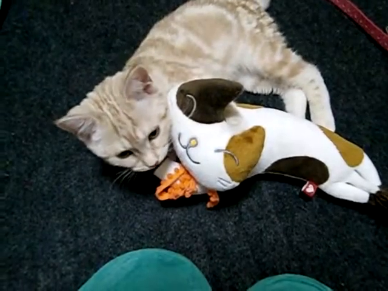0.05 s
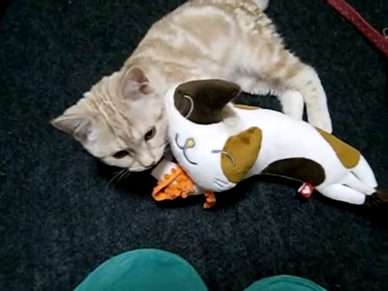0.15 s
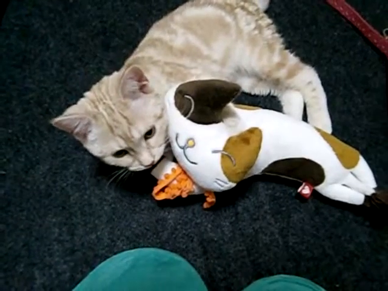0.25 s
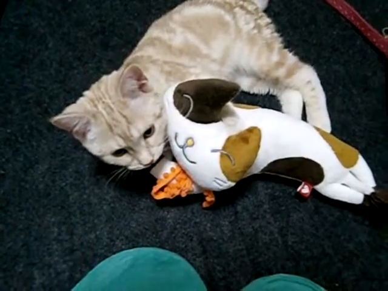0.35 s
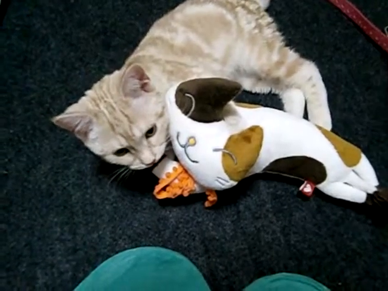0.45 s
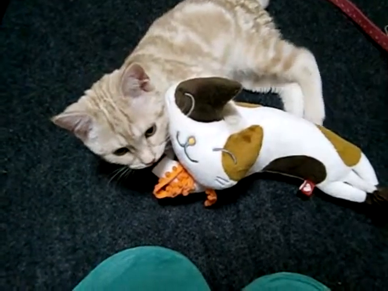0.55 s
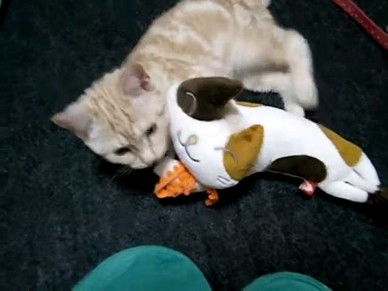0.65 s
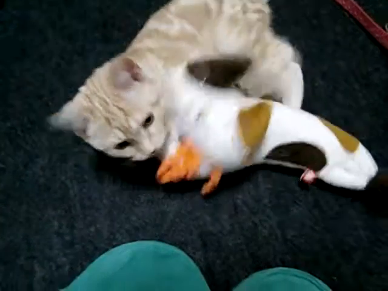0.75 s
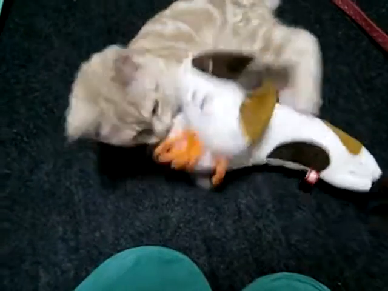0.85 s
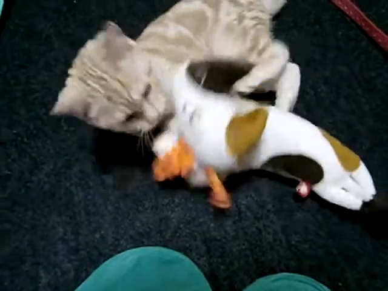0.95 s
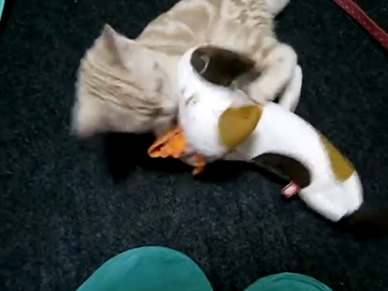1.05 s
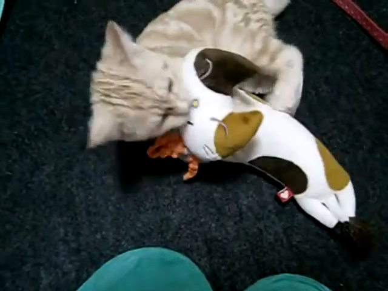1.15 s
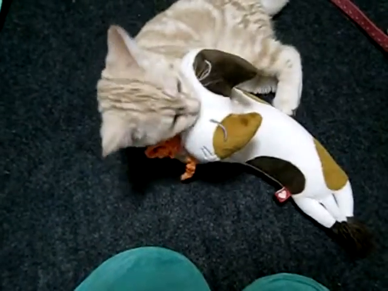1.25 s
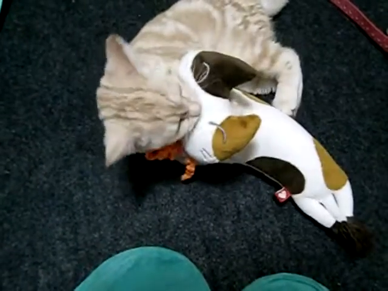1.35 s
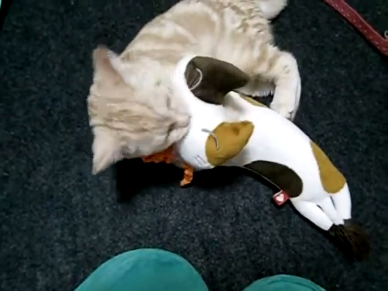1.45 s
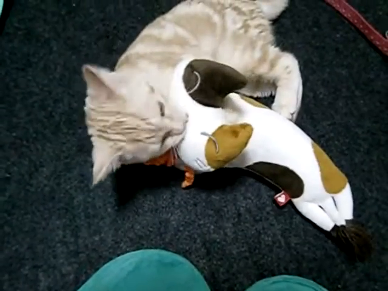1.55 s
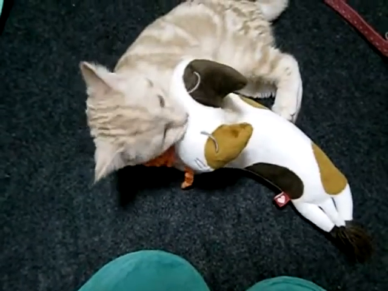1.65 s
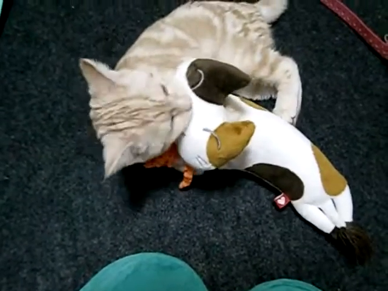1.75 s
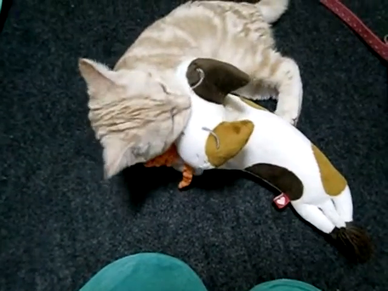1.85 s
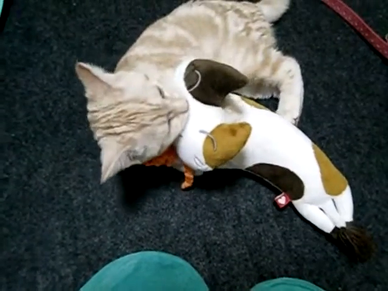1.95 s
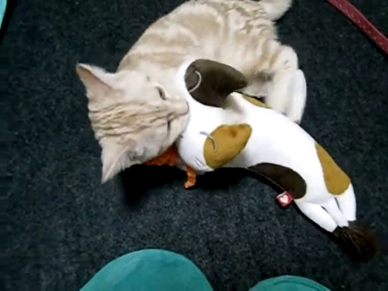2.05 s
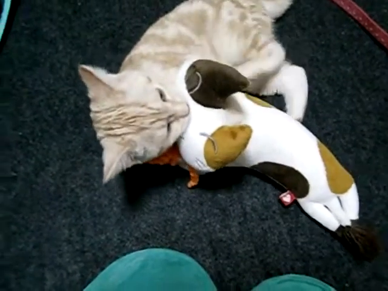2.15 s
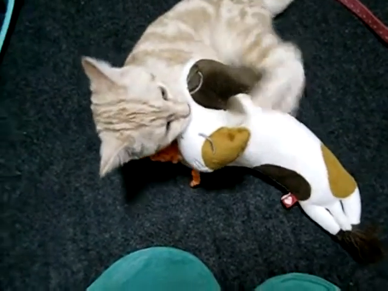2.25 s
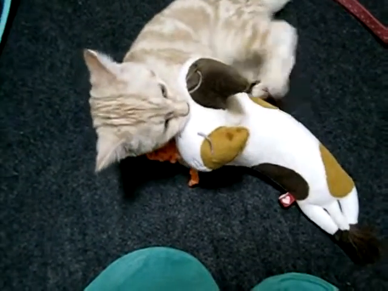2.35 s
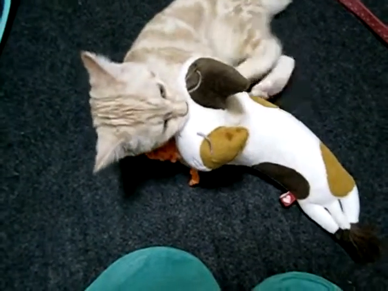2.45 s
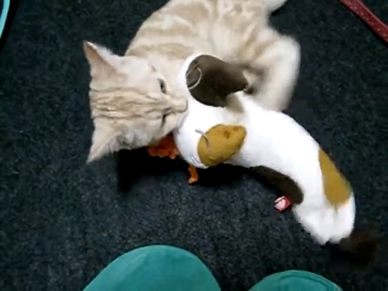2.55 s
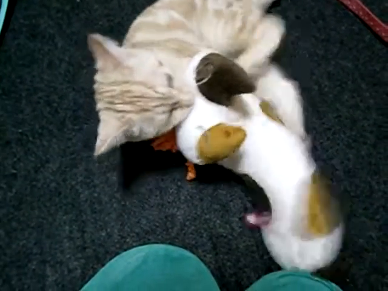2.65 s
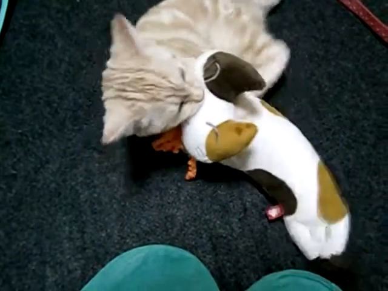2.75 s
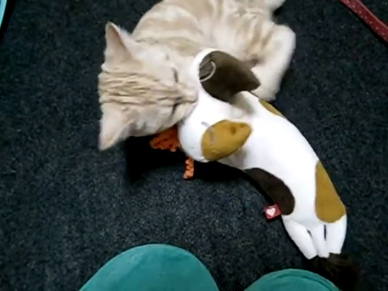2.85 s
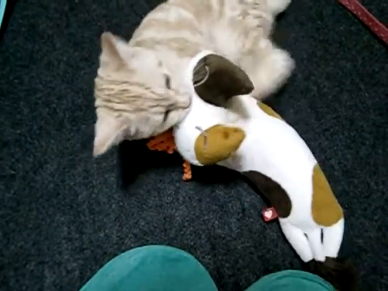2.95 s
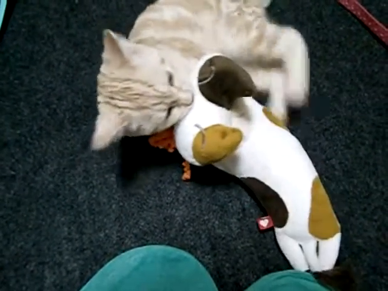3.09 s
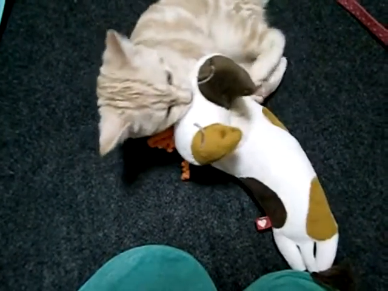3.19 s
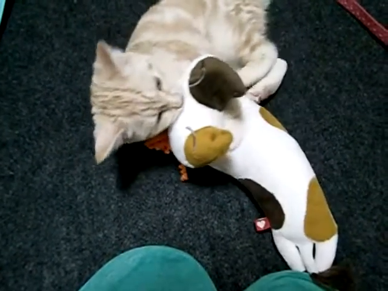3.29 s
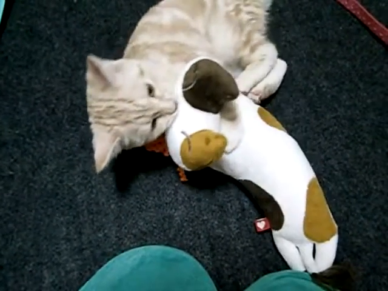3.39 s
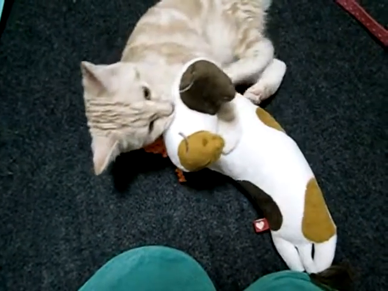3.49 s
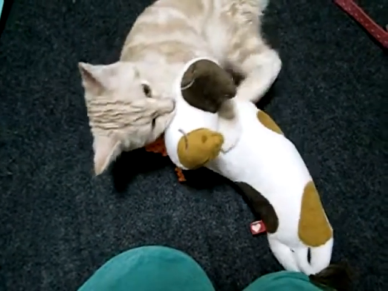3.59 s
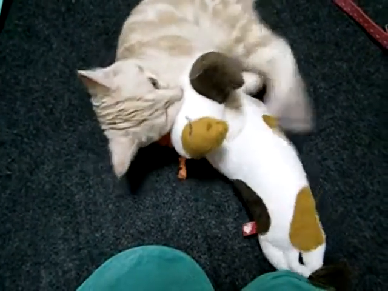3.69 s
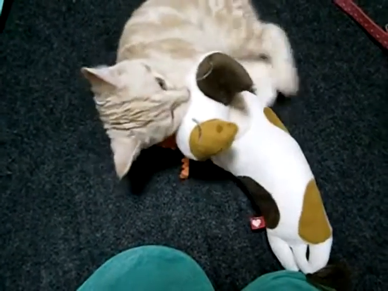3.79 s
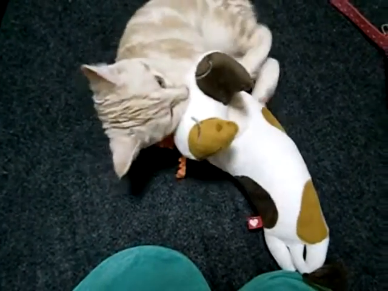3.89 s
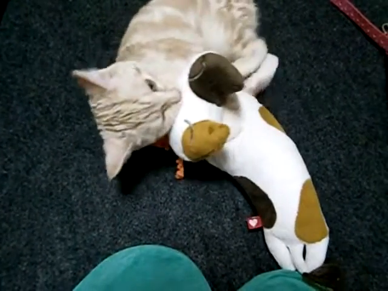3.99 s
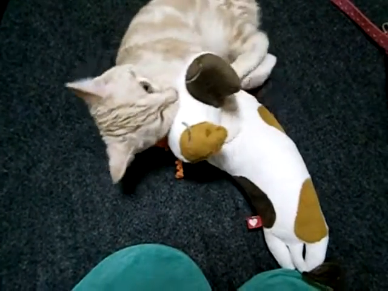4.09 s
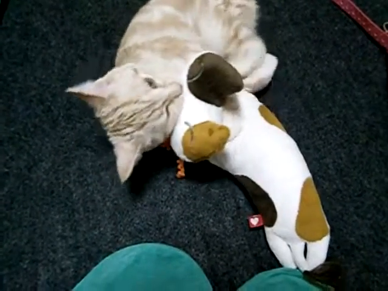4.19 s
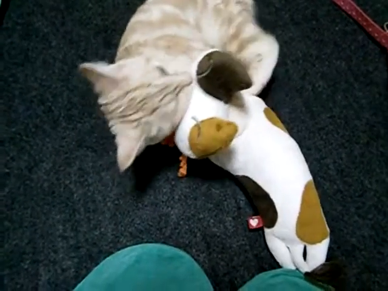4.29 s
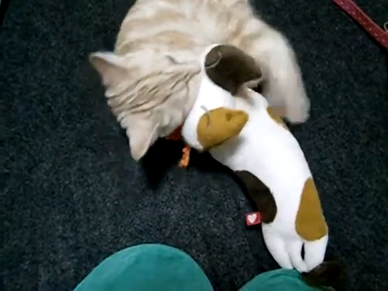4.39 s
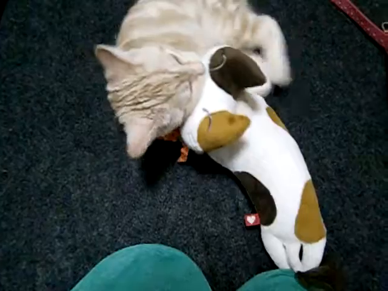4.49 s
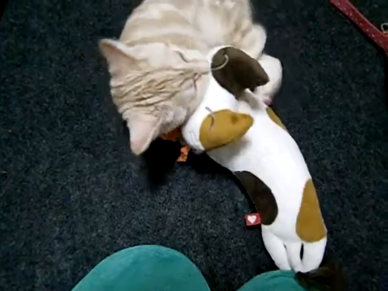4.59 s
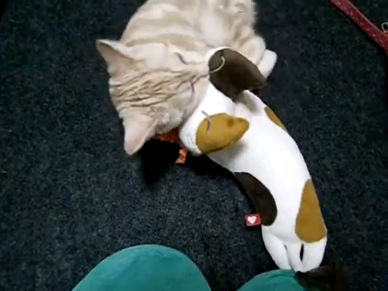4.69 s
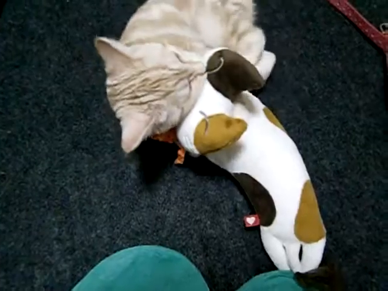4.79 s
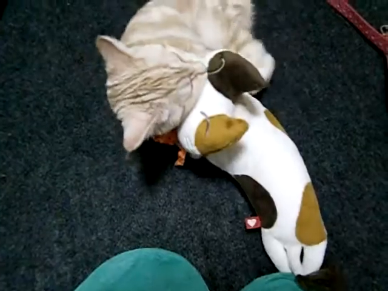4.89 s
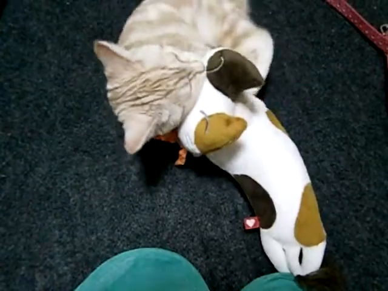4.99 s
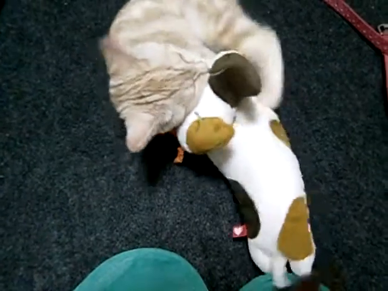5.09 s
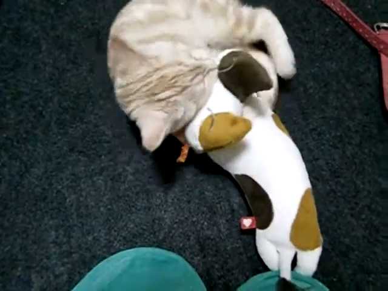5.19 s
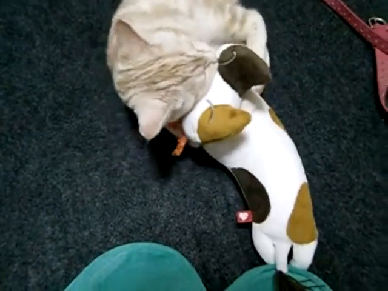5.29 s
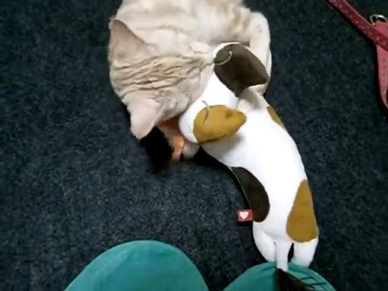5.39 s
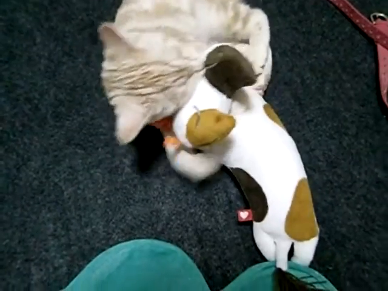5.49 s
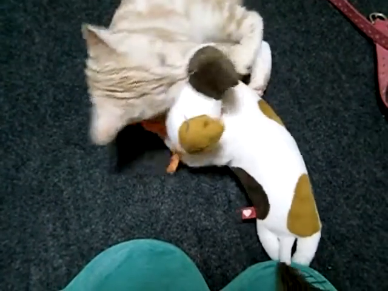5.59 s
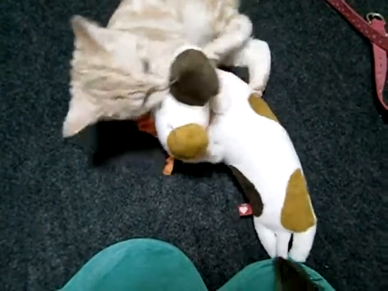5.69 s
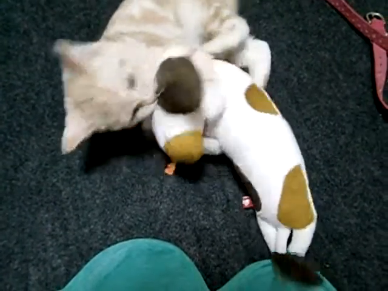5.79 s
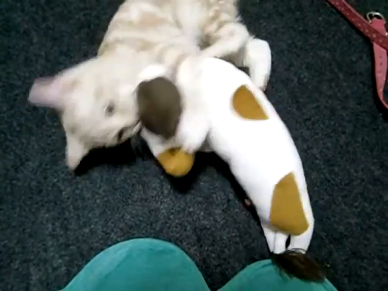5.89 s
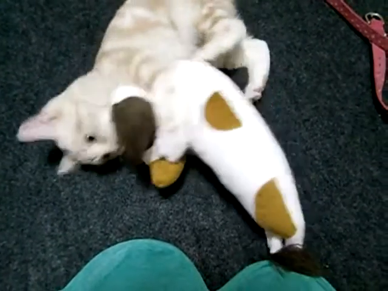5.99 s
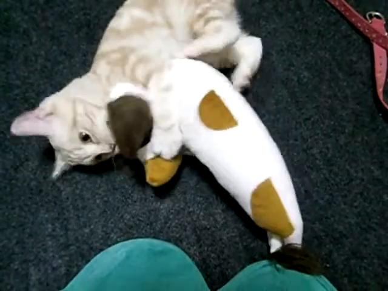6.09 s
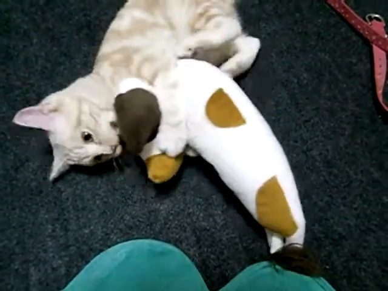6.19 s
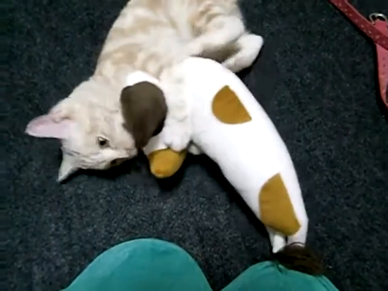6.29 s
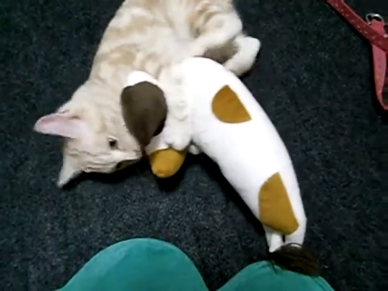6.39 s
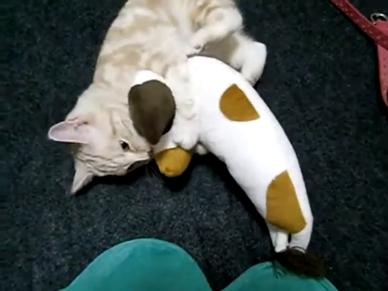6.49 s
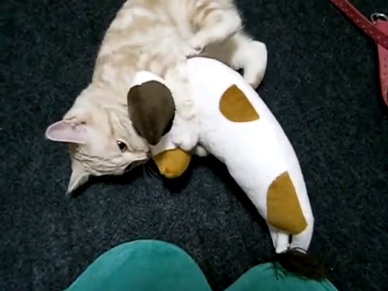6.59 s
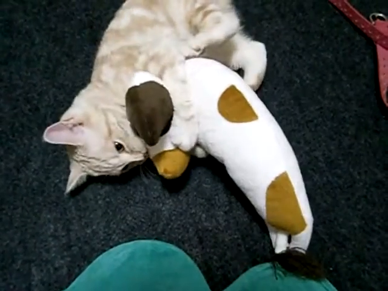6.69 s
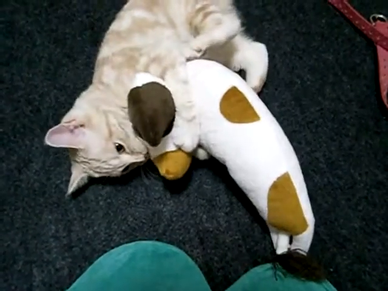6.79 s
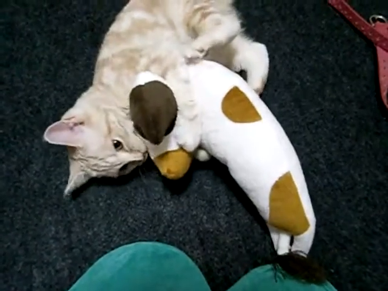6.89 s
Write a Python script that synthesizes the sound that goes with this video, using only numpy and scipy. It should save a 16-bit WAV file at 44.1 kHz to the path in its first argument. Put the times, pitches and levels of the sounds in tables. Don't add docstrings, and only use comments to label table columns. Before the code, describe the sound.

Quiet room hush, then a kitten's kicked plush toy rattles its tiny bright bell in uneven bursts, fading to a gentle roll.

```python
import sys
import numpy as np
from scipy import signal
from scipy.io import wavfile
from scipy.ndimage import uniform_filter1d

SR = 44100
rng = np.random.default_rng(int(sys.argv[2]) if len(sys.argv) > 2 else 0)


def voltage_ratio(decibels):
    exponent = np.asarray(decibels, float) / 20
    return 10 ** exponent


def int16_out(signal):
    q = np.round(np.clip(np.atleast_2d(signal).T, -1, 1) * 32767)
    wavfile.write(sys.argv[1], SR, q.astype(np.int16))


N = 306318


def evened(x):
    return x / np.sqrt(np.mean(x ** 2))


def add(mix, s, sound):
    part = mix[round(s * SR):][:len(sound)]
    part += sound[:len(part)]


def resonate(x, hz, width):
    pole = np.exp((2j * np.pi * hz - np.pi * width) / SR)
    return 2 * signal.lfilter([1 - abs(pole)], [1, -pole], x).real


def ring_filter(x, hz, t60, softness_hz):
    soft = resonate(x, hz, softness_hz)
    return resonate(soft, hz, np.log(1000) / np.pi / t60) * t60 * SR / (2 * np.log(1000))


def decaying(hits, t60_e):
    return signal.lfilter([1], [1, -np.exp(-1 / (t60_e * SR))], hits)


# [f/Hz, level/dB per Hz]
HUSH_COLOUR = [(12, -55), (20, -1.5), (91, -5), (164, -3.5), (257, -9), (437, -9.5), (532, -11.5),
               (811, -14.5), (5020, -25.5), (15000, -27.5), (16300, -26.5)]
# [f/Hz, width/Hz, level/dB rms]
HUM = [
    (119.8, 29, -68),
    (163.1, 13.4, -66.5),
]


def hush(level_db=-56.5, patchy_db=0.66):
    frames, hz = N // 256 + 5, np.fft.rfftfreq(1024, 1 / SR)
    a, b, patches = rng.standard_normal((frames, 513, 3)).T
    patches = evened(uniform_filter1d(uniform_filter1d(patches, 12, 0), 14, 1))
    f, db = np.transpose(HUSH_COLOUR)
    colour_db = np.interp(np.log(hz + 1), np.log(f + 1), db)[:, None]
    spectra = (a + 1j * b) * voltage_ratio(colour_db + patchy_db * patches)
    air = signal.istft(spectra, nperseg=1024, noverlap=768)[1][:N]
    noise = rng.standard_normal(N)
    hum = sum(voltage_ratio(g) * evened(resonate(resonate(noise, f, w), f, w)) for f, w, g in HUM)
    return voltage_ratio(level_db) * evened(air) + hum


# [f/Hz, width/Hz, level/dB]
TICK_BODY = [
    (1120, 1200, 3.5),
    (2150, 580, -3.5),
    (3840, 1500, 7.5),
]
# [t/s, peak level/dB]
MOUNT_TICKS = [(.7958, -26.5), (.8013, -29), (.8196, -26), (.8401, -29.5), (.9007, -34), (.928, -33.5),
               (1.0239, -32), (1.0526, -33.5), (1.1601, -36), (1.191, -38), (1.2212, -34), (1.3314, -40),
               (2.6263, -34), (2.6414, -28), (2.6508, -27), (2.6715, -34), (2.6861, -25.5), (2.6917, -25.5),
               (2.6977, -32), (2.737, -31), (2.7416, -24.5), (2.788, -29.5),
               (3.0139, -25), (3.0532, -32), (3.0614, -24.5), (3.068, -25), (3.1015, -26), (3.1051, -21),
              (3.1294, -26), (3.2072, -35.5), (3.7496, -27.5), (3.7704, -27.5), (3.8298, -25.5),
              (3.9208, -33.5), (4.4641, -32.5), (4.4965, -31.5), (4.5874, -33), (5.0608, -28.5),
              (5.077, -35.5), (5.1002, -38), (5.1189, -27), (5.212, -32.5), (5.2648, -30.5), (6.1075, -38)]
# [t/s, peak level/dB]
FAINT_TICKS = [(0.8254, -33), (0.8754, -35), (1.0384, -39), (1.1157, -33.5), (2.945, -38.5), (2.9926, -35),
               (3.2001, -46), (3.2283, -35), (3.8204, -35), (3.8701, -40), (3.9498, -36), (4.3784, -41),
               (4.5296, -39), (5.1089, -31.5), (5.1741, -39), (5.1887, -35.5), (5.3086, -33.5)]


def ticks(rows, contacts, burst_s=0.00024, chatter_db=-16, chatter_s=0.0079, per_s=1100):
    out, t = np.zeros(N), np.arange(500) / SR
    jolt_db = -26.5 + 0.48 * contacts[:, 1] + 2 * rng.standard_normal(len(contacts))
    rows = rows + list(zip(contacts[:, 0], jolt_db))
    bursts = rng.standard_normal((len(rows), 500))
    for (s, db), burst in zip(rows, bursts):
        blow = (1 + .5 * burst) * np.exp(-t / burst_s) * np.sin(2 * np.pi * t / burst_s / 2)
        colour = 2 * np.tanh(burst[::-1])
        tick = np.zeros(500)
        for (f, w, g), c in zip(TICK_BODY, colour):
            tick += voltage_ratio(g + c) * resonate(blow, f * (1 + c / 20), w)
        tick *= voltage_ratio(db - 1.5) / abs(tick).max()
        add(out, s, tick)

    knocks = np.zeros(N)
    knocks[[round(s * SR) for s, db in rows]] = voltage_ratio(np.transpose(rows)[1] + chatter_db)
    loose = decaying(knocks, chatter_s)
    taps = loose * rng.uniform(-1.27, 1, N) * (rng.random(N) < per_s / SR)
    out += sum(voltage_ratio(g) * resonate(taps, f, w) * SR / (2 * np.pi * w) for f, w, g in TICK_BODY)
    return out - 0.28 * uniform_filter1d(out, size=41)


# [t/s, across-slot level/dB, along-slot level/dB]
FIRST_KICK = [(.7963, -57, -31), (.8045, -39, -43), (.8193, -24, -26), (.8275, -30, -49), (.84, -42, -49),
              (.8483, -56, -60), (.888, -44, -33), (.9005, -40, -28), (.9174, -33, -39), (.9266, -41, -38),
              (.9593, -27, -28), (.967, -40, -42), (.9796, -29.5, -33), (.997, -45, -34),
              (1.0174, -50, -42), (1.0285, -61, -45), (1.0322, -49, -40), (1.0375, -33.5, -31),
              (1.101, -55, -45), (1.1217, -42.5, -33.5), (1.1396, -52, -50), (1.1727, -55, -48),
              (1.1995, -47, -46), (1.2216, -48, -45)]
# [t/s, across-slot level/dB, along-slot level/dB]
HARD_KICK = [(2.6263, -53, -61), (2.6336, -52, -61), (2.6445, -45, -46), (2.6505, -37, -52),
             (2.6625, -38, -40), (2.67, -30, -44), (2.679, -33, -43), (2.6824, -28, -37), (2.691, -26, -40),
             (2.697, -15.5, -19), (2.7004, -22, -27), (2.7035, -23, -28), (2.7068, -16, -25),
             (2.7112, -31, -30), (2.719, -14.5, -15), (2.723, -27, -22), (2.7368, -52, -51),
             (2.745, -59, -58), (2.75, -52, -51), (2.7576, -65, -58), (2.788, -41, -51), (2.8092, -34, -41),
             (2.8191, -39, -29), (2.8289, -37, -31), (2.8404, -42, -35), (2.8772, -43, -33),
             (2.8971, -50, -24), (2.9057, -46, -27), (2.93, -57, -33.5), (2.993, -53, -42)]
# [t/s, across-slot level/dB, along-slot level/dB]
REBOUND = [(3.0151, -50, -34), (3.0168, -37, -30), (3.043, -34, -40), (3.052, -23, -33), (3.061, -34, -40),
           (3.0647, -23, -19), (3.0714, -43, -32), (3.08, -30, -36), (3.0906, -38, -43),
           (3.0945, -22.5, -41), (3.098, -17.5, -29), (3.1042, -19, -26), (3.1097, -19, -18),
           (3.1286, -21, -11), (3.1502, -29, -19), (3.1596, -41, -46), (3.1768, -25.5, -45),
           (3.191, -35, -31), (3.207, -53, -27), (3.2122, -28.5, -24), (3.2235, -47, -44),
           (3.2359, -38, -50), (3.2633, -42, -55), (3.3376, -66, -36), (3.346, -44, -45),
           (3.3666, -53, -28.5), (3.3965, -58, -39), (3.4239, -46, -31)]
# [t/s, across-slot level/dB, along-slot level/dB]
SWAT = [(3.523, -61, -40.5), (3.576, -74, -42.5), (3.729, -45, -53), (3.7383, -26.5, -22),
        (3.751, -32, -44), (3.7563, -28, -18.5), (3.77, -42, -41), (3.7765, -16, -20), (3.8025, -31.5, -51),
        (3.83, -45, -37), (3.8316, -26.5, -19), (3.856, -55, -29.5), (3.8633, -33, -46),
        (3.8714, -33.5, -46), (3.9208, -49, -55), (3.95, -49, -34.5), (4.0169, -68, -50), (4.083, -59, -44),
        (4.097, -54, -37.5), (4.195, -67, -49)]
# [t/s, across-slot level/dB, along-slot level/dB]
NUDGE = [(4.4078, -66, -44), (4.4225, -52, -40), (4.4506, -53, -31), (4.4635, -37, -36), (4.498, -32, -22),
         (4.5183, -55, -40), (4.531, -45, -43), (4.587, -43, -37), (4.611, -57, -42), (4.646, -51, -31.5),
         (4.657, -57, -35), (4.7102, -66, -41), (4.788, -70, -35), (4.857, -69, -51)]
# [t/s, across-slot level/dB, along-slot level/dB]
TUG = [(5.062, -42, -33), (5.0754, -50, -38), (5.1, -37, -44), (5.11, -39, -45), (5.1175, -38, -46),
       (5.1257, -28.5, -25), (5.132, -54, -47), (5.1365, -26.5, -22), (5.1465, -27.5, -24),
       (5.1621, -38, -30), (5.1886, -58, -37), (5.195, -41, -45), (5.2093, -31.5, -44),
       (5.2124, -31.5, -33), (5.222, -37, -34), (5.2665, -36, -27), (5.2887, -50, -30), (5.2962, -35, -20),
       (5.3248, -38, -22.5), (5.3673, -53, -30.5), (5.4111, -72, -45)]
# [t/s, across-slot level/dB, along-slot level/dB]
ROLL = [(5.721, -58, -44), (5.741, -59, -42), (5.7555, -76, -43), (5.8233, -54, -40.5), (5.9086, -43, -36),
        (5.9393, -61, -32), (5.9504, -64, -37), (5.9712, -68, -38), (5.98, -73, -33), (6.0156, -69, -34.5),
        (6.062, -58, -40.5), (6.0724, -52, -48), (6.0836, -60, -42), (6.11, -62, -43), (6.124, -65, -38),
        (6.203, -49, -43), (6.214, -51, -58), (6.2465, -64, -41), (6.257, -54, -38), (6.3027, -75, -48),
        (6.475, -64, -49), (6.725, -55, -45)]
# [t/s, level/dB]
FLANK = [(.7963, -27), (.8193, -35), (.888, -41), (.9005, -44), (1.0375, -33.5), (1.1217, -39.5),
         (2.643, -36), (2.6505, -20.5), (2.669, -25), (2.698, -14), (2.7068, -17.5), (2.7035, -20),
         (2.7112, -23), (2.7368, -15), (2.7446, -26), (2.751, -26), (3.0149, -29), (3.052, -29),
         (3.0647, -21), (3.0705, -24), (3.1086, -16), (3.1499, -30.5), (3.771, -30), (3.9206, -37.5),
         (4.4638, -34), (4.5869, -39), (5.0606, -41), (5.1091, -39), (5.133, -24), (5.1886, -41),
         (5.2663, -36.5), (.84, -54), (.9174, -40), (.9266, -52), (.9593, -55), (.965, -41), (1.0174, -61),
         (1.0322, -41), (1.101, -43), (1.1995, -48), (1.2216, -55), (2.8092, -44), (3.2363, -56),
         (3.7388, -57), (3.75, -39), (3.7563, -55), (3.856, -57), (3.95, -54), (4.4225, -51), (4.646, -49),
         (4.6563, -49), (4.7105, -45), (5.0758, -45), (5.1, -44), (5.1628, -55), (5.2129, -43),
         (5.2959, -53), (5.3233, -56), (6.0724, -58), (6.214, -48)]
# [t/s, level/dB]
SHOULDER = [(.7963, -33), (.9174, -31.5), (.9593, -24), (.9796, -27.5), (2.691, -23), (2.7004, -22),
            (2.708, -20), (2.7233, -29), (2.787, -40), (2.8187, -34), (2.8968, -31.5), (3.0149, -46),
            (3.0606, -29), (3.08, -27), (3.1034, -24), (3.1289, -23), (3.1593, -27.5), (3.2117, -29),
            (3.523, -42), (3.7303, -42.5), (3.7757, -24), (3.8032, -34), (4.4495, -48), (5.1258, -31),
            (5.1364, -32), (5.1628, -35), (5.2946, -29.5), (5.9088, -38.5), (5.9706, -35.5), (.8193, -43),
            (.888, -51), (1.0174, -45), (2.6625, -50), (2.7198, -30), (2.7576, -40), (2.8092, -37),
            (2.8404, -38), (3.0897, -36), (3.1499, -39), (3.191, -41), (3.2613, -41.5), (3.3373, -55),
            (3.347, -49), (3.4236, -37), (3.7388, -48), (3.8326, -29), (2.8772, -45), (5.1465, -42),
            (4.498, -43), (4.7105, -52), (5.195, -43), (5.224, -43), (5.2891, -34), (5.3672, -57),
            (5.8233, -45), (6.0156, -55), (6.0724, -46), (6.2467, -45), (6.3027, -49)]
# [t/s, level/dB]
CROWN = [(.8483, -40), (.888, -37), (1.0285, -36), (1.101, -37), (1.1727, -44), (2.6263, -39), (2.643, -25),
         (2.679, -26), (2.691, -21), (2.787, -36), (2.8406, -29), (3.052, -33), (3.0647, -35),
         (3.1086, -28), (3.2117, -29), (3.8032, -26), (3.829, -55), (3.834, -24), (4.4978, -42),
         (5.1258, -30), (5.1941, -25.5), (5.2093, -35), (6.214, -42), (.8193, -56), (.9174, -53),
         (.9593, -54), (2.6336, -36), (2.8289, -52), (2.8772, -39), (3.098, -41), (3.1289, -35),
         (3.1499, -36), (3.1766, -54), (2.6625, -50), (2.719, -42), (3.3965, -43), (3.523, -45),
         (3.7388, -61), (3.7563, -59), (4.587, -49), (4.646, -53), (5.062, -50), (5.1628, -35),
         (5.2959, -50), (5.3233, -59), (5.9088, -59), (5.1365, -38), (5.9706, -51), (5.1465, -34),
         (3.7759, -38), (4.5183, -43), (6.2467, -50), (6.257, -49), (6.3027, -54)]
GLANCE_DB = [
    -22,
    -14,
    -25,
]


def blows(glance_spread_db=6.5, choke_db=2):
    shakes = [*FIRST_KICK, *HARD_KICK, *REBOUND, *SWAT, *NUDGE, *TUG, *ROLL]
    low = np.array(sorted(map(tuple, shakes)))
    s = low[:, 0]
    spread = np.tanh(rng.standard_normal((len(s), len(GLANCE_DB))))
    upper = low[:, 1:].max(axis=1)[:, None] + GLANCE_DB + glance_spread_db * spread
    for k, spot in enumerate([FLANK, SHOULDER, CROWN]):
        for at, db in spot:
            upper[abs(s - at).argmin(), k] = db

    aimed = np.isin(np.arange(len(s)), [abs(s - at).argmin() for at, db in CROWN])
    fall_db = 60 / np.array([family[0][1] for family in SHELL[2:]])
    for i in range(1, len(s)):
        left = upper[i - 1] - fall_db * (s[i] - s[i - 1]) - choke_db
        ringing_on = np.maximum(upper[i], left)
        upper[i] = np.where([False, False, aimed[i]], upper[i], ringing_on)
    return np.column_stack([low, upper])


# [f/Hz, ..]
SHELL_HZ = [
    [4755, 3530],
    [4905, 5230, 14030],
    [9380, 9550, 11900, 14900],
    [11480, 12300],
    [13100, 8490],
]
# [level/dB against the family, t60/s, strike-to-strike spread/dB]
SHELL = [
    [(.6, .06, .6), (-46, .08, 8)],
    [(1.5, .013, 1.2), (-7, .01, 5), (-30, .03, 4)],
    [(.6, .02, 1.2), (-9, .025, 5), (-4, .012, 5), (-14, .012, 5)],
    [(.6, .04, .6), (-10, .012, 6)],
    [(-3.6, .09, .6), (-21, .05, 8)],
]


def bell(rows, detune=.0001, crack_db=-15.0, crack_s=0.0043, muffle=0.67, free_db=-23, rise_turns=3):
    family = np.repeat(np.arange(len(SHELL)), [len(f) for f in SHELL])
    hz = np.concatenate(SHELL_HZ)
    mode_db, t60, spread_db = np.transpose(sum(SHELL, []))
    chance = np.tanh(rng.standard_normal((len(rows), 3, len(hz))))
    starts = np.round(rows[:, 0] * SR).astype(int)
    ends = np.minimum(np.append(starts[1:], N), starts + SR // 4)
    out, ringing = np.zeros(N), np.zeros(len(hz), complex)
    for row, start, end, (size, turn, tune) in zip(rows, starts, ends, chance):
        family_db = row[1 + family]
        height = voltage_ratio(family_db + mode_db + spread_db * size)
        kick = np.maximum(height - abs(ringing), 0) * np.exp(.6j * turn)
        struck = height * np.exp(1j * np.angle(ringing + kick))
        t = np.arange(end - start + 1)[:, None] / SR
        pitch = hz * (1 + detune * tune / t60)
        loose = np.clip(muffle + (1 - muffle) / (1 + voltage_ratio(free_db - family_db) ** 2), .1, 1)
        ring_s = t60 * np.where(family > 1, loose, 1)
        free = np.exp(t * (2j * np.pi * pitch - np.log(1000) / ring_s))
        handover = np.exp(-(t * hz / rise_turns) ** 2)
        modes = free * (struck + (ringing - struck) * handover)
        out[start:end] += modes[:-1].real.sum(axis=1)
        ringing = modes[-1]

    hits = np.zeros(N)
    hits[starts] = voltage_ratio(rows[:, 3:].max(axis=1) + crack_db)
    crack = decaying(hits, crack_s) * rng.standard_normal(N)
    return out + resonate(np.diff(crack, prepend=0), 5700, 8300)


def afterring(rows, hz=4756, t60=0.13, across_db=-26, along_db=-38, share=0.86):
    hits = np.zeros(N)
    strength = voltage_ratio(share * rows[:, 1] + across_db) + voltage_ratio(share * rows[:, 2] + along_db)
    hits[np.round(rows[:, 0] * SR).astype(int)] = strength
    return ring_filter(hits, hz, t60, 301)


# [f/Hz, t60/s]
SKIP_MODES = [
    (4770, 0.034),
    (4910, 0.015),
    (5150, 0.0083),
    (9200, 0.0039),
    (11600, 0.014),
    (8560, 0.0072),
]


def rolling(rows, per_s=330, settle_s=0.021, share=0.5, level_db=-38, upper_db=-5):
    unrest = np.zeros((2, N))
    strength_db = np.array([rows[:, 1], rows[:, 1:3].max(axis=1)])
    unrest[:, np.round(rows[:, 0] * SR).astype(int)] = voltage_ratio(share * strength_db + level_db)
    unrest = decaying(unrest, settle_s)[[0, 1, 1, 1, 1, 1]]
    taps = unrest * rng.standard_normal(unrest.shape) * (rng.random(unrest.shape) < per_s / SR)
    rings = [ring_filter(tap, hz, t60, 600) for tap, (hz, t60) in zip(taps, SKIP_MODES)]
    return sum(rings[:3]) + voltage_ratio(upper_db) * sum(rings[3:])


# [t/s, f/Hz, peak level/dB]
PINGS = [(1.103, 7400, -58), (2.7085, 7900, -44), (2.7217, 8050, -48), (2.7217, 8490, -37),
         (1.0375, 3530, -58), (2.8417, 3530, -60), (3.1096, 3520, -45), (2.5, 3520, -60),
         (2.876, 3540, -60), (3.2117, 3550, -59), (3.7388, 7700, -53), (3.1089, 8500, -45),
         (3.1083, 8300, -43), (3.832, 8600, -37), (5.125, 7800, -45), (5.1465, 8030, -50),
         (5.136, 7900, -39), (5.2955, 8050, -46), (.888, 8000, -52), (0.99, 8490, -50), (.9796, 8000, -55),
         (1.0375, 8100, -50), (2.8406, 8400, -49), (3.2117, 8490, -52), (4.646, 8490, -52),
         (5.1628, 8490, -52), (5.3672, 8400, -52)]
# [t/s, peak level/dB]
TOP_PINGS = [(2.6824, -34), (2.7217, -23), (2.7882, -47), (3.0648, -28), (3.0705, -24), (3.1499, -28),
             (3.8327, -37), (5.1941, -42), (5.2955, -38), (5.9712, -44), (6.216, -46), (6.3027, -51),
             (.8193, -51), (.8275, -53), (1.0322, -53), (2.6336, -50), (2.691, -22), (2.751, -42),
             (2.7576, -50), (3.052, -36), (3.1766, -47), (3.2625, -54), (3.3666, -43), (3.3965, -53),
             (3.8025, -40), (5.222, -55), (5.28, -52), (5.3672, -43), (5.9088, -51), (5.939, -53),
             (6.2467, -55)]


def pings(top_t60=0.032, rise_s=0.00016):
    out, t = np.zeros(N), np.arange(5000) / SR
    top_hz = max(SHELL_HZ[1])
    for s, hz, db in [*PINGS, *[(s, top_hz, db) for s, db in TOP_PINGS]]:
        t60 = min(top_t60 * (top_hz / hz) ** 2, .13)
        envelope = voltage_ratio(db - 60 * t / t60) * (1 - np.exp(-t / rise_s))
        add(out, s, envelope * np.sin(2 * np.pi * hz * t))
    return out


# [t/s, along-slot level/dB, flank level/dB, shoulder level/dB, crown level/dB]
GRAZES = [(.8764, -36, -58, -61, -61), (.9714, -42, -47, -40, -54), (1.0114, -53, -58, -55, -54),
          (1.0234, -44, -47, -48, -54), (1.0944, -43, -52, -52, -51), (1.1904, -50, -53, -68, -66),
          (1.268, -51, -70, -64, -66), (2.7674, -50, -54, -52, -55), (2.7974, -42, -56, -49, -56),
          (2.9684, -40, -63, -52, -69), (3.2274, -38, -51, -52, -56), (3.2724, -44, -66, -56, -56),
          (3.295, -41, -72, -48, -62), (3.359, -44, -63, -49, -56), (3.412, -44, -62, -53, -59),
          (3.6277, -50, -69, -54, -61), (3.8204, -44, -53, -56, -56), (3.8751, -27, -57, -52, -57),
          (4.442, -40, -62, -64, -65), (4.6014, -41, -71, -57, -66), (5.1744, -46, -50, -54, -56),
          (5.238, -40, -62, -60, -64), (5.2504, -36, -56, -48, -61), (5.2804, -48, -62, -52, -57),
          (5.3074, -40, -43, -52, -62), (5.802, -48, -70, -66, -70), (5.846, -44, -70, -64, -70),
          (5.866, -52, -70, -66, -70), (5.886, -52, -70, -66, -70), (5.9244, -44, -65, -50, -67),
          (5.9978, -43, -71, -53, -70), (6.0914, -43, -54, -45, -65), (6.172, -52, -66, -53, -61),
          (6.239, -41, -68, -60, -68), (6.319, -51, -70, -64, -68)]


def grazes(rise_s=0.00028, cling=0.96):
    out, t = np.zeros(N), np.arange(3000) / SR
    hz = np.array([family[0] for family in SHELL_HZ[1:]])[:, None]
    t60 = cling * np.array([family[0][1] for family in SHELL[1:]])[:, None]
    rings = voltage_ratio(-60 * t / t60) * (1 - np.exp(-t / rise_s)) * np.sin(2 * np.pi * hz * t)
    for s, *db in GRAZES:
        add(out, s, voltage_ratio(np.array(db)) @ rings)
    return out


# [t/s, level/dB, f/Hz]
THUMPS = [
    (3.7234, -35, 533),
    (3.728, -40.5, 232),
    (4.4111, -38, 415),
    (4.418, -39, 615),
    (6.1072, -36.5, 785),
    (4.4131, -44, 605),
]


def thumps(turns=0.73):
    out, t = np.zeros(N), np.arange(1500) / SR
    for s, db, hz in THUMPS:
        swing = np.sin(2 * np.pi * hz * t + 0.61 * np.sin(4 * np.pi * hz * t))
        add(out, s, -voltage_ratio(db) * swing * np.exp(-t * hz / turns))
    return out


def room(x, t60=0.0071, first=60):
    taps, at = np.zeros(SR // 4), np.arange(0, SR // 4 - 400, 20)
    at = at + rng.integers(0, 20, len(at)) + first
    taps[at] = rng.choice([-1., 1.], len(at)) * voltage_ratio(-60 * at / SR / t60)
    return signal.fftconvolve(x, taps / np.linalg.norm(taps))[:N]


def scene():
    rows = blows()
    knocks = ticks(MOUNT_TICKS, rows)
    jingle = bell(rows) + afterring(rows) + rolling(rows) + pings() + grazes()
    near = jingle + knocks + thumps()
    wet = voltage_ratio(-13) * room(near)
    faint = ticks(list(FAINT_TICKS), rows[:0])
    return (near + wet + hush() + faint)[None]


def top_cut(x):
    return signal.sosfilt(signal.butter(12, 16510, fs=SR, output="sos"), x)


def record(dry):
    edge = signal.firwin(511, 15780, window=("kaiser", 9), fs=SR)
    mix = signal.oaconvolve(dry, edge[None], "same")
    return top_cut(mix)


dry = scene()
out = record(dry)
int16_out(out)
```